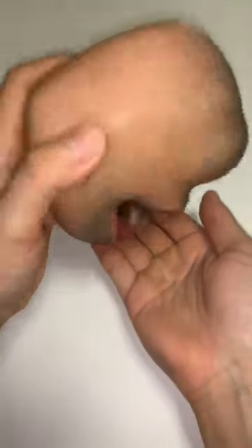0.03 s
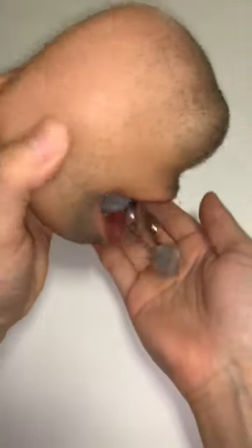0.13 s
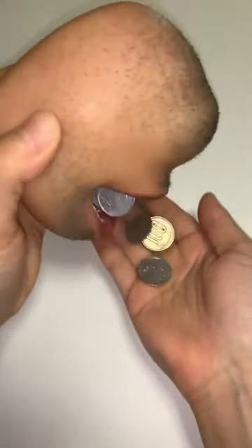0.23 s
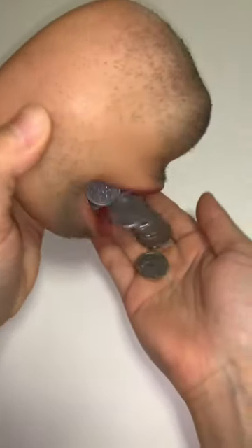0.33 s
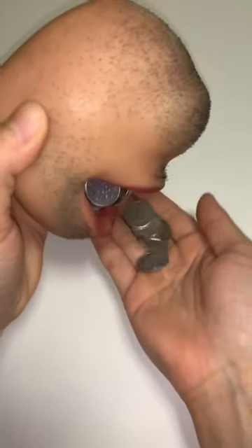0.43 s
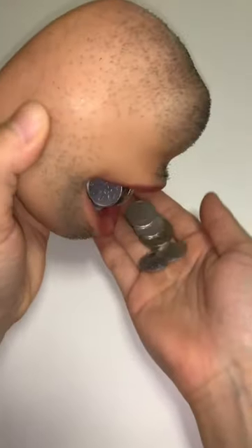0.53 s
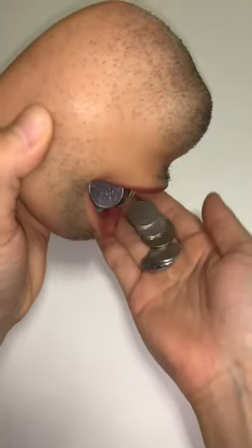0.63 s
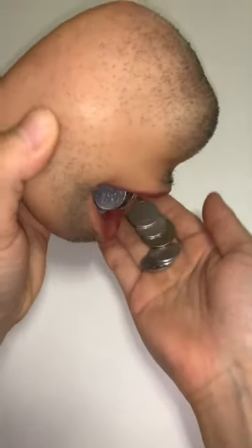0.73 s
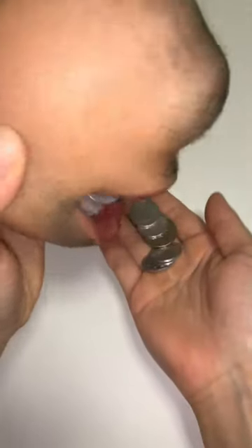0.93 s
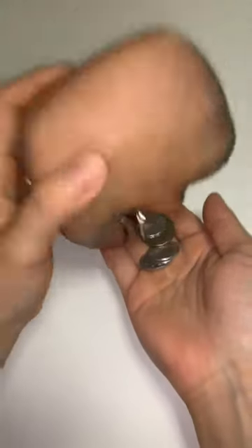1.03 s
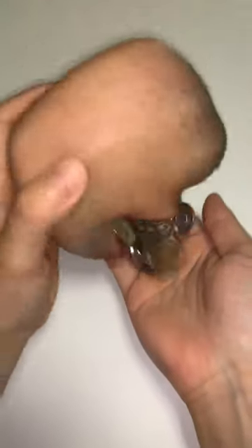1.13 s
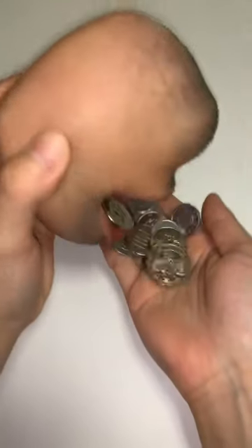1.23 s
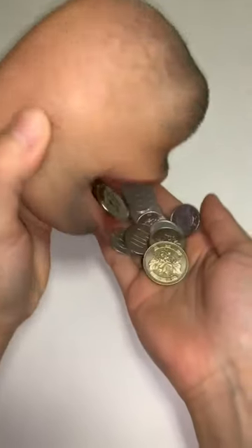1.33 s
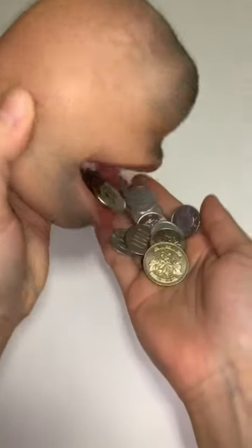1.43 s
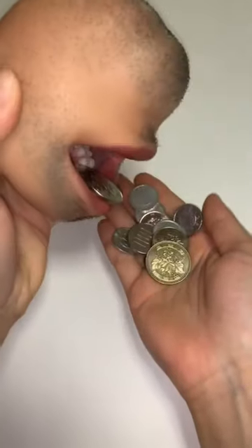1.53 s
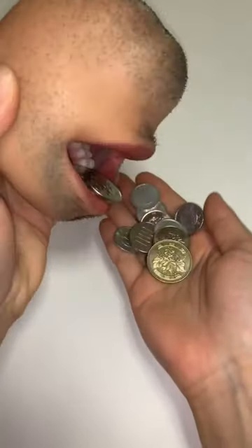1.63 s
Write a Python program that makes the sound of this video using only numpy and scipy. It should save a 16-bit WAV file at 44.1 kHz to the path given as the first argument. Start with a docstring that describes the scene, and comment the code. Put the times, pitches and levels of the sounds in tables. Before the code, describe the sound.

Two quick handfuls of coins jingle and spill into a hand, with a short quiet gap between

```python
"""Faint room rumble, then a soft knock, ticks and a rattle: coins are shaken from a soft hollow bank into a palm.
Two handfuls come out with a quiet gap between, close to a phone. The rattle is many tiny random contacts,
knocks ring the hollow inside, ticks are short noise bursts, and single coins ring on two tones each
until skin or another coin stops them. A soft thump of the hand and a narrow hush come near the end."""
import sys
import numpy as np
from scipy import signal
from scipy.fft import rfft, irfft
from scipy.io import wavfile
from scipy.ndimage import uniform_filter1d

SR = 44100
rng = np.random.default_rng(int(sys.argv[2]) if len(sys.argv) > 2 else 0)


def log_audio(samples):
    """Write samples as a 16-bit WAV file to the path given in sys.argv[1]."""
    # one column per channel
    frames = np.atleast_2d(samples).T
    # limit to full scale, then quantise
    limited = np.clip(frames, -1, 1)
    pcm = np.round(limited * 32767).astype(np.int16)
    wavfile.write(sys.argv[1], SR, pcm)


N = 72765  # length in samples
TIME_S = np.arange(N) / SR
OPPOSITE = np.array([[1], [-1]])  # the same sound, flipped in the right channel


def undb(db):
    """Turn decibels into a plain multiplier."""
    return 10 ** (np.asarray(db) / 20)


def unit(x):
    """Scale a sound to an average (RMS) strength of 1."""
    return x / np.sqrt(np.mean(x ** 2))


def colour(x, table):
    """Filter by (pitch_hz, level_db) points joined along log pitch; 60 dB down outside them."""
    pitch_hz, level_db = np.array(table).T
    bins_hz = np.fft.rfftfreq(N, 1 / SR) + 1  # +1 avoids log of zero
    curve_db = np.interp(np.log(bins_hz), np.log(pitch_hz), level_db, left=-60, right=-60)
    return irfft(rfft(x) * undb(curve_db), N)


def fade(seconds, t60_s):
    """Die away by 60 dB every t60_s seconds."""
    return undb(-60 * seconds / t60_s)


def ring(x, hz, t60_s):
    """One fading tone (a mode) set off by x; an impulse of 1 rings with a peak near 1."""
    pole = np.exp(2j * np.pi * hz / SR - np.log(1000) / (t60_s * SR))
    return signal.lfilter([1], [1, -pole], x).imag


# Loudness of the room noise along pitch: pitch_hz, level_db (per Hz, before the overall room level)
ROOM_COLOUR = [(12, -37), (20, 2.5), (36, -1), (77, -13.5), (222, -28.5), (367, -36), (410, -40),
               (2750, -52.5), (8650, -55), (16000, -56.5)]
ROOM_DB, ROOM_SIDE_DB = -59, -18  # whole room noise; its left-right difference against the middle
THUMP_S, THUMP_SPREAD_S, THUMP_HZ, THUMP_DB = 1.34, .04, 95, -51
HUSH_START_S, HUSH_HZ, HUSH_WIDTH_HZ, HUSH_DB = 1.42, 1370, 220, -77


def room():
    """Low rumble and faint hiss from shaped noise, a soft thump as the hand gives, a narrow hush late on."""
    mid, side = (unit(colour(rng.standard_normal(N), ROOM_COLOUR)) for _ in range(2))
    noise = undb(ROOM_DB) * (mid + undb(ROOM_SIDE_DB) * side * OPPOSITE)
    swell = np.exp(-((TIME_S - THUMP_S) / THUMP_SPREAD_S) ** 2)
    thump = undb(THUMP_DB) * swell * np.sin(2 * np.pi * THUMP_HZ * TIME_S)
    band = [(HUSH_HZ - HUSH_WIDTH_HZ, -20), (HUSH_HZ, 0), (HUSH_HZ + HUSH_WIDTH_HZ, -20)]
    hush = undb(HUSH_DB) * unit(colour(rng.standard_normal(N), band)) * (TIME_S > HUSH_START_S)
    return noise + thump + hush


# Stepped phase difference between left and right channels, by pitch: pitch_hz, difference_radians
PHASE_STEPS = [(0, 0), (500, -.35), (2200, .05), (2600, .4), (5000, 3.14), (5800, 3.2), (7700, 6.25),
               (8800, 6.35), (11200, 9.35), (12200, 9.5), (14300, 12.5), (17000, 12.57)]


def stereo(x):
    """Make stereo: shift the phase of each pitch half forward on the left and half back on the right."""
    difference = np.interp(np.fft.rfftfreq(N, 1 / SR), *np.array(PHASE_STEPS).T)
    return irfft(rfft(x) * np.exp(.5j * np.array([difference, -difference])), N)


STRENGTH_MEAN_DB, HARDEST_DB = 2.5, 8  # average before the limit; no chance contact lands harder than the limit


def strengths():
    """Contact strengths: mostly light, a few harder."""
    return undb(np.minimum(STRENGTH_MEAN_DB * rng.exponential(size=N), HARDEST_DB))


CONTACTS_PER_S, SMEAR_T60_S, SMEAR_DB = 2500, 0.024, 9.5  # smear level: tail energy against its contact


def contacts():
    """Dense uneven contacts at random moments, each smeared by a short noise tail."""
    struck = rng.random(N) < CONTACTS_PER_S / SR
    clicks = struck * rng.choice([-1, 1], N) * strengths()
    tail_s = np.arange(SR // 10) / SR
    tail = rng.standard_normal(len(tail_s)) * fade(tail_s, SMEAR_T60_S)
    tail *= undb(SMEAR_DB) / np.sqrt(np.sum(tail ** 2))
    return unit(clicks + signal.fftconvolve(clicks, tail)[:N])


PINGS_PER_S = 790


def pings(span_hz, t60_s, table):
    """Each contact rings one short mode of its own, high or low by chance."""
    clicks = (rng.random(N) < PINGS_PER_S / SR) * strengths()
    modes_hz = np.linspace(*span_hz, num=70) + 40 * rng.standard_normal(70)
    which = rng.integers(0, len(modes_hz), N)
    rung = sum(ring(clicks * (which == k), hz, t60_s) for k, hz in enumerate(modes_hz))
    return unit(colour(rung, table))


def jingle(x):
    """Many coins touching: close, short, high modes, each struck with its own random strength."""
    modes_hz = np.linspace(13800, 15250, num=16) + 50 * rng.standard_normal(16)
    rung = sum(ring(x * rng.standard_normal(N), hz, t60_s=.035) for hz in modes_hz)
    low_pass = signal.cheby1(8, 1, 15500, fs=SR, output="sos")
    return signal.sosfilt(low_pass, rung)


# Coins tumbling in the hollow, loudness over time: time_s, level_db
TUMBLE = [(0, -66.5), (.15, -51.5), (.36, -44), (.42, -58), (.74, -66.5), (.8, -121), (1.09, -87),
          (1.12, -41.5), (1.27, -55), (1.31, -81.5), (1.47, -89)]
# Ringing modes of the hollow bank: pitch_hz, level_db, t60_s (time to fade by 60 dB)
HOLLOW = [(783, -2, 0.047), (715, -19, 0.01), (899, -17.5, 0.05), (517, -14, 0.029), (1510, -7, 0.0046),
          (2330, -10.5, 0.048), (2818, -4.5, 0.014), (4244, -12, 0.0095)]


def tumble(body):
    """Dull contacts set off the first four modes of the hollow."""
    rung = unit(sum(undb(db) * ring(body, hz, t60_s) for hz, db, t60_s in HOLLOW[:4]))
    return undb(np.interp(TIME_S, *np.array(TUMBLE).T)) * rung


# Rattle parts over time: time_s, bright_db, jingle_db (many modes), dull_db
RATTLE = [(0, -60.5, -77, -64), (0.051, -59.5, -76, -66.5), (0.061, -40, -45, -51.5), (.1, -54.5, -61, -56),
          (0.152, -39, -42, -48), (0.186, -29, -33, -37), (.24, -35, -30, -42.5), (.3, -40.5, -40, -48),
          (.4, -42, -39, -55.5), (0.446, -31, -17, -50), (0.517, -36.5, -44, -45.5),
          (0.547, -45, -40, -54.5), (.62, -46, -64, -54.5), (0.731, -45, -33, -56),
          (0.752, -65.5, -49.5, -72.5), (.81, -89, -85, -92), (1.079, -85, -100, -86),
          (1.111, -63.5, -70.5, -72), (1.119, -46.5, -39.5, -63), (1.164, -28.5, -25.5, -32.5),
          (1.2, -28, -24, -39), (1.249, -23.5, -14.5, -39.5), (1.35, -25, -41.5, -48.5),
          (1.398, -31.5, -23.5, -48.5), (1.414, -46, -50, -58), (1.493, -85, -81, -86.5)]
# Shape of the bright sound along pitch: pitch_hz, level_db (per Hz)
BRIGHT = [(3000, -41), (4000, -13), (6000, -1), (8000, -1.5), (10500, 8.5), (12500, 9), (15300, -9),
          (15900, -23.5)]
# Shape of the dull sound along pitch: pitch_hz, level_db (per Hz)
DULL = [(300, -35), (550, -8.5), (1200, 0), (2500, 2), (3300, -6.5), (4200, 10), (5500, -18.5)]
# Shape of the rattle that is unrelated between left and right: pitch_hz, level_db (per Hz)
APART = [(250, -28), (500, -12), (1500, -12), (3200, -32.5), (6500, -2.5), (9000, -27)]
APART_DB = -7.5
PING_HZ, PING_T60_S, PING_DB = (5826, 12940), 0.028, 0.5  # stray edge modes of the pile, about this range
CLINK_HZ, CLINK_T60_S, CLINK_DB = (1802, 5159), 0.041, -3  # low modes of stacked coins, about this range


def rattle():
    """Contacts sound bright, dull, through many coin modes and through the hollow."""
    times_s, *parts_db = np.array(RATTLE).T
    bright, modes, dull = (undb(np.interp(TIME_S, times_s, db)) for db in parts_db)
    touches = contacts()
    body = unit(colour(touches, DULL))
    edges = unit(colour(touches, BRIGHT)) + undb(PING_DB) * pings(PING_HZ, PING_T60_S, BRIGHT)
    # separate contacts for left and right widen the sound
    apart = np.array([unit(colour(contacts(), APART)) for _ in range(2)])
    clinks, side_clinks = [pings(CLINK_HZ, CLINK_T60_S, DULL) for _ in range(2)]
    apart = apart + undb(-5) * side_clinks * OPPOSITE
    clinking_body = undb(-3.5) * body + undb(CLINK_DB) * clinks
    shared = bright * edges + modes * unit(jingle(touches)) + dull * clinking_body + tumble(body)
    return stereo(shared) + undb(APART_DB) * dull * apart


KNOCK_PUSH_S, UPPER_FROM_HZ = 0.0029, 1200
KNOCK_SPREAD_DB = 2.2  # typical random change of each mode's level in each knock
KNOCK_DETUNE = .012  # typical random share by which each mode's pitch shifts in each knock
# Knocks inside the bank: start_s, level_db, upper_db (added to the upper modes of the hollow)
KNOCKS = [(0.059, -42.5, -33), (0.124, -32.5, 3), (0.156, -28, -21), (0.18, -25, -15), (0.2, -26, -8.5),
          (0.211, -27.5, -3.5), (0.258, -26.5, -8), (0.265, -28, -4), (0.305, -37, -24), (0.326, -35, -10),
          (0.337, -34.5, -14.5), (0.362, -24.5, -8), (0.521, -26, -30), (0.543, -37, -19),
          (1.1239, -25, -2), (1.173, -22.5, -7), (1.18, -27.5, 10), (1.191, -24, 11), (1.231, -20.5, -4.5),
          (1.262, -29, 1)]


def knocks():
    """Each soft push rings the low modes of the hollow, and the upper ones as hard as the edge lands."""
    push, out = np.hanning(int(KNOCK_PUSH_S * SR)), np.zeros(N + SR)
    chance = rng.standard_normal((len(KNOCKS), len(HOLLOW), 2))
    for (start_s, level_db, upper_db), draws in zip(KNOCKS, chance):
        for (hz, mode_db, t60_s), (level_draw, pitch_draw) in zip(HOLLOW, draws):
            hz = hz * (1 + KNOCK_DETUNE * pitch_draw)
            # a push in step with the mode builds it up smoothly
            swell = push * np.cos(2 * np.pi * hz * np.arange(len(push)) / SR)
            rung = ring(np.pad(2 * swell / push.sum(), (0, SR // 10)), hz, t60_s)
            total_db = level_db + mode_db + upper_db * (hz > UPPER_FROM_HZ) + KNOCK_SPREAD_DB * level_draw
            out[int(start_s * SR):][:len(rung)] += undb(total_db) * rung
    return out[:N]


TICK_T60_S, SNAP_DB, TICK_JINGLE_DB, TICK_DULL_DB = 0.013, -17.5, -31.5, -21.5
# Coin edges ticking on each other: start_s, level_db (before the tick is coloured)
TICKS = [(0.0618, -41), (0.136, -31), (0.18, -25.5), (0.1845, -15), (0.2083, -14), (0.2627, -24.5),
         (0.3465, -26), (0.3645, -21), (0.3685, -20), (0.4075, -17.5), (0.4366, -9), (0.4534, -12),
         (0.4854, -30), (0.4993, -19), (0.5585, -16), (0.605, -24.5), (0.6553, -22.5), (0.717, -33.5),
         (1.1196, -24.5), (1.1545, -20.5), (1.161, -10), (1.1915, -11.5), (1.2125, -8), (1.2405, -8.5),
         (1.2505, -15), (1.2655, -14), (1.2901, -12), (1.3023, -27), (1.3428, -18.5), (1.3497, -12),
         (1.3602, -14.5), (1.3901, -28.5)]


def ticks():
    """A snap and a few ms of noisy chatter, which also jingles the pile."""
    snaps = np.zeros(N)
    for start_s, level_db in TICKS:
        snaps[int(start_s * SR)] += undb(level_db)
    chatter = signal.fftconvolve(snaps, fade(np.arange(SR // 20) / SR, TICK_T60_S))[:N]
    burst = chatter * rng.standard_normal(N) + undb(SNAP_DB) * snaps
    dull = undb(TICK_DULL_DB) * colour(burst, DULL)
    return colour(burst, BRIGHT) + dull + undb(TICK_JINGLE_DB) * jingle(snaps)


STOP_T60_S = 0.01  # once touched, a ring dies by this further 60 dB fade
FLICKER_DB, FLICKER_PER_S = 2.5, 130  # neighbours brush a ringing coin; spread before smoothing
# The two modes of each coin: mode1_hz, mode2_hz
COIN_HZ = {"small": (14640, 14230), "wide": (10445, 10545), "middle": (13880, 14000),
           "thick": (13270, 14525), "big": (7452, 10820), "tiny": (15430, 15090)}
# Each coin: free t60_s, then its strikes: start_s, rise_s, free_s (rings untouched), mode1_db, mode2_db
COINS = { "small": (0.19, [ (.206, 0.0034, 0.081, -44, -26.5), (.279, 0.00092, 0.037, -52, -21.5),
         (.366, 0.00073, 0.021, -12, -35.5), (.414, 0.007, 0.045, -23, -48), (.436, .001, 0.0085, -22, -16),
         (.449, 0.0013, 0.0055, -14, -32), (.5588, 0.00054, 0.0036, -19, -5),
         (.566, 0.0012, 0.077, -24, -25.5), (.654, 0.00037, 0.0027, -21, -22.5),
         (.718, 0.0024, 0.0029, -20, -39), (.7243, 0.001, 0.0049, -17, -18),
         (1.173, 0.0011, 0.0039, -23.5, -28), (1.2405, 0.00098, .003, -13, -14.5),
         (1.25, 0.00082, 0.0018, -24, -21.5)]), "wide": (0.43, [ (.366, 0.0029, 0.093, -57.5, -26.5),
         (.406, 0.00076, 0.02, -34, -21), (.437, 0.0012, 0.011, -10.5, -39),
         (.454, 0.0013, 0.025, -22.5, -17.5), (.486, 0.0008, 0.032, -40.5, -25.5),
         (.654, 0.00078, 0.0075, -23.5, -62), (1.21, 0.00096, 0.074, -24, -36.5),
         (1.245, 0.0012, 0.014, -55, -18)]), "middle": (0.73, [ (.367, .001, 0.0059, -44, -19),
         (.453, .002, 0.044, -12.5, -17), (.497, .002, 0.021, -23.5, -29)]),
         "thick": (0.46, [ (.125, 0.0026, 0.079, -41.5, -60), (1.193, 0.0022, .012, -18.5, -44.5),
         (1.205, 0.0036, 0.045, -52, -29), (1.292, 0.02, 0.063, -7.5, -27),
         (1.355, 0.0029, 0.015, -13, -40), (1.372, 0.002, 0.009, -17, -47.5),
         (1.388, 0.0013, .012, -17, -46.5)]), "big": (0.16, [ (1.197, 0.0012, 0.01, -34.5, -8.5),
         (1.303, 0.0016, 0.028, -27, -41), (1.395, 0.0044, 0.09, -34, -42.5), (1.44, 0.064, .2, -22, -92)]),
         "tiny": (.3, [(.449, .001, 0.0087, -31.5, -14.5), (1.265, 0.0011, 0.0021, -26, -10.5),
         (1.352, 0.0026, 0.015, -39.5, -21)]), }


def rings():
    """Each strike swells, rings freely on the coin's two modes, then is stopped."""
    out, step = np.zeros(N), int(SR / FLICKER_PER_S)
    for name, (t60_s, strikes) in COINS.items():
        stepped = np.repeat(rng.standard_normal(N // 100), step)[:N]
        brush = undb(FLICKER_DB * uniform_filter1d(stepped, step))
        for start_s, rise_s, free_s, *modes_db in strikes:
            since_s = np.maximum(TIME_S - start_s, 0)
            swell = np.sin(np.pi / 2 * np.clip(since_s / rise_s, 0, 1)) ** 2
            stopped = fade(np.maximum(since_s - free_s, 0), STOP_T60_S)
            flicker = brush / brush[int((start_s + rise_s) * SR)]  # 1 at the end of the rise
            envelope = swell * fade(since_s, t60_s) * stopped * flicker
            for hz, db, phase in zip(COIN_HZ[name], modes_db, rng.random(2)):
                out += undb(db) * envelope * np.sin(2 * np.pi * (hz * since_s + phase))
    return out


def scene():
    """Add the separate rings, ticks and knocks, the rattle and the room."""
    return stereo(rings() + ticks() + knocks()) + rattle() + room()


def record(dry):
    """The phone cuts the top: a steep low-pass filter at 16200 Hz."""
    return signal.sosfilt(signal.ellip(10, .2, 70, 16200, fs=SR, output="sos"), dry)


dry = scene()
out = record(dry)
log_audio(out)
```